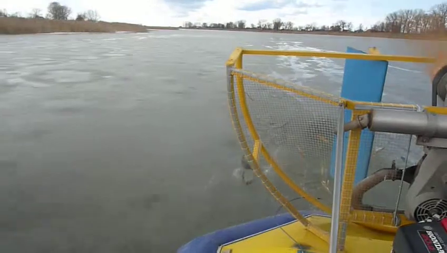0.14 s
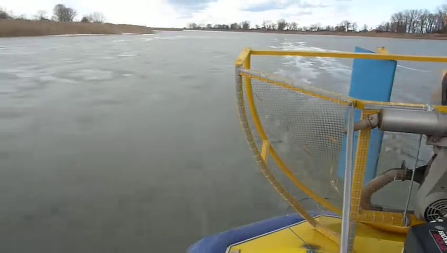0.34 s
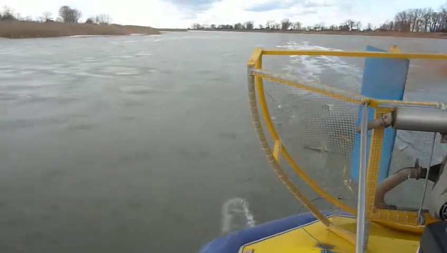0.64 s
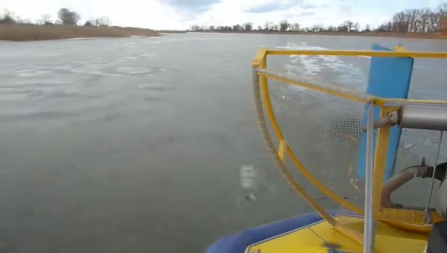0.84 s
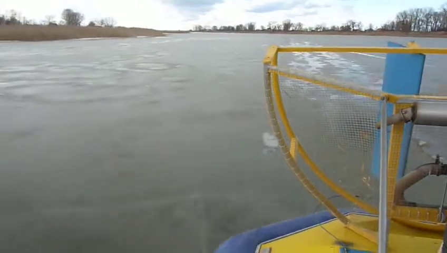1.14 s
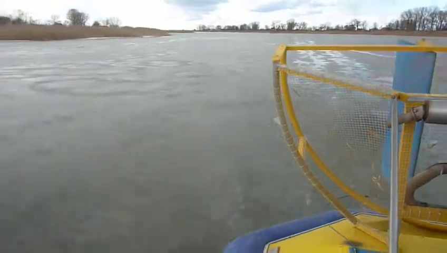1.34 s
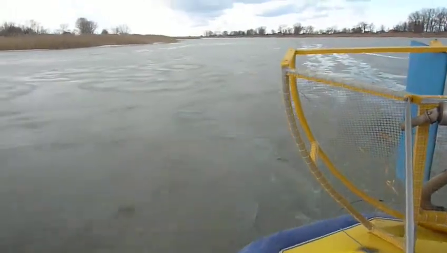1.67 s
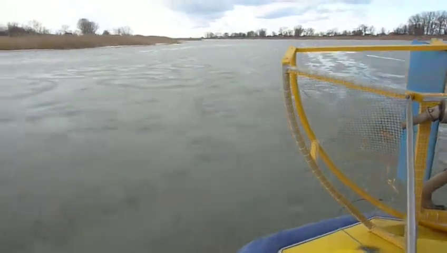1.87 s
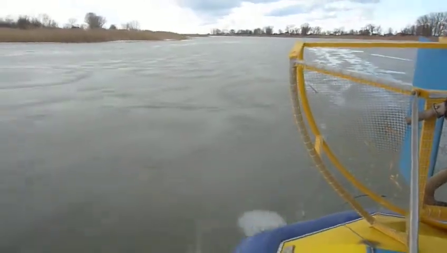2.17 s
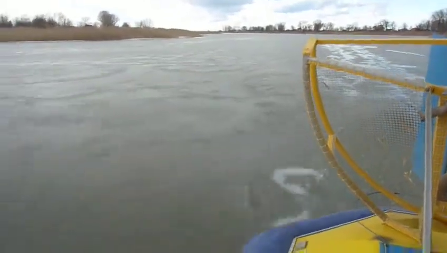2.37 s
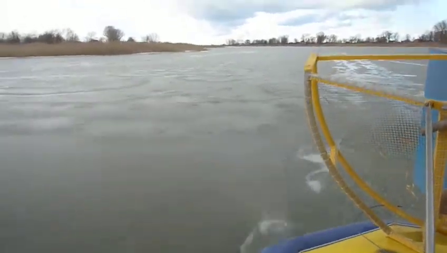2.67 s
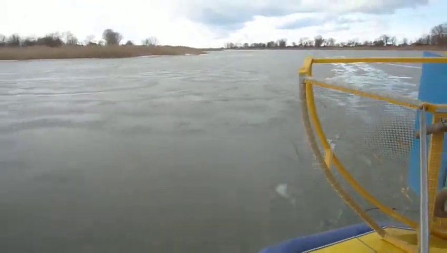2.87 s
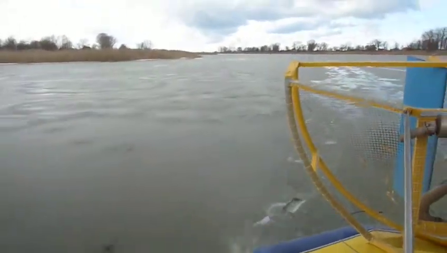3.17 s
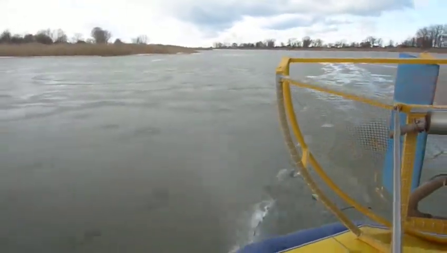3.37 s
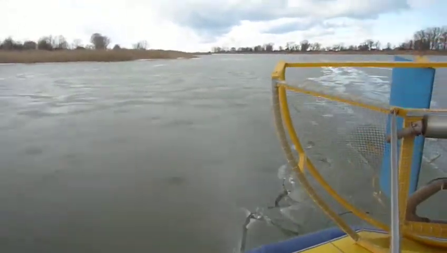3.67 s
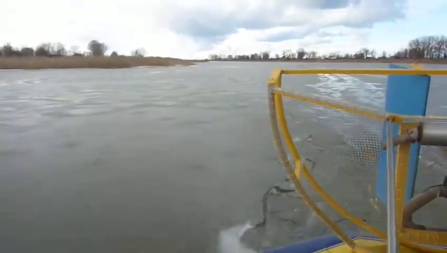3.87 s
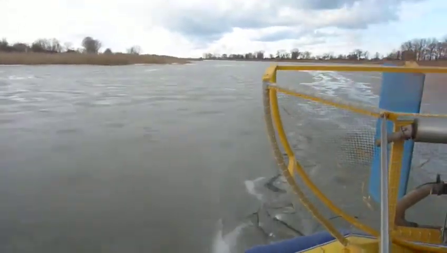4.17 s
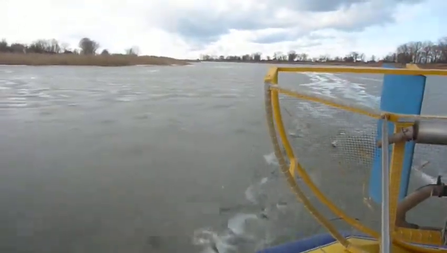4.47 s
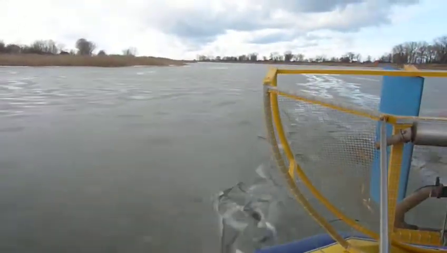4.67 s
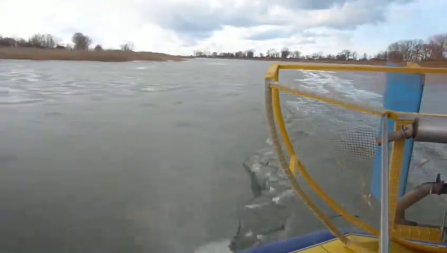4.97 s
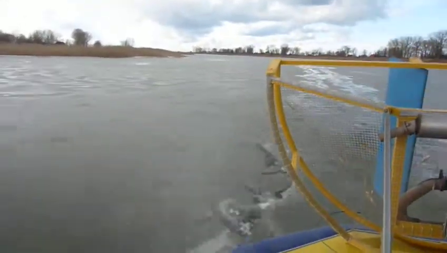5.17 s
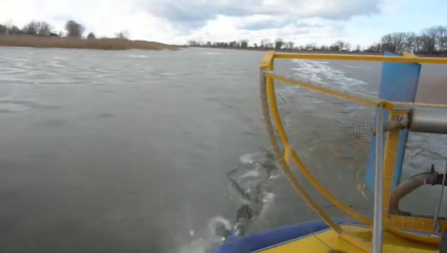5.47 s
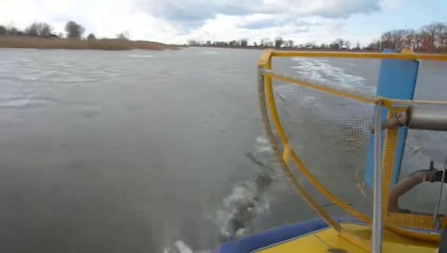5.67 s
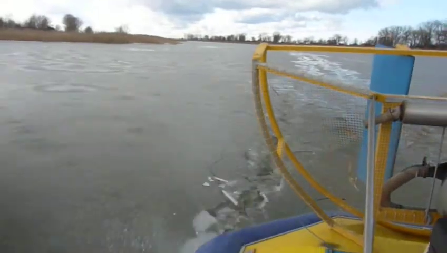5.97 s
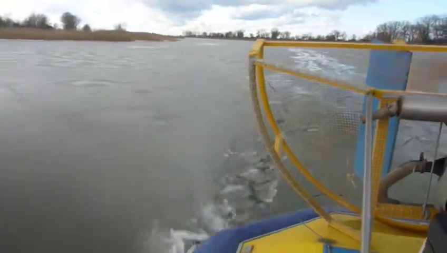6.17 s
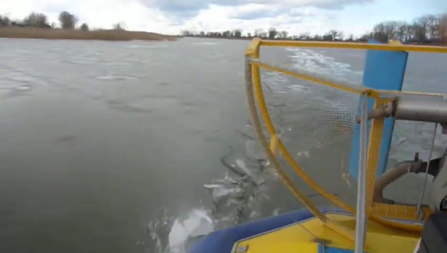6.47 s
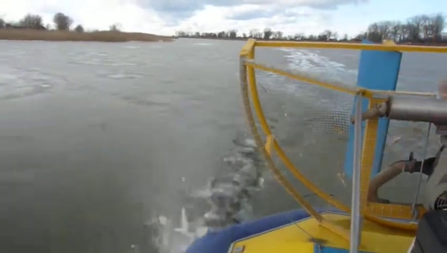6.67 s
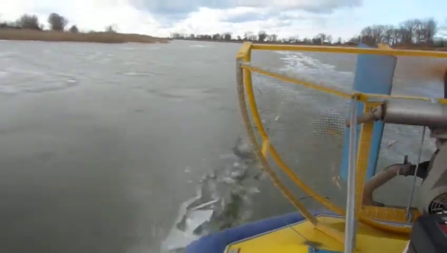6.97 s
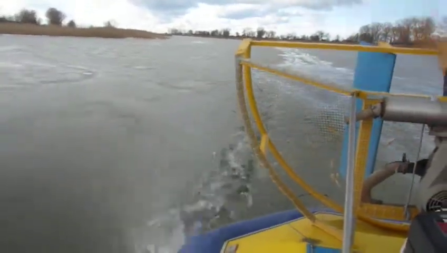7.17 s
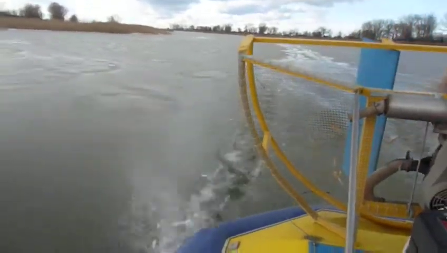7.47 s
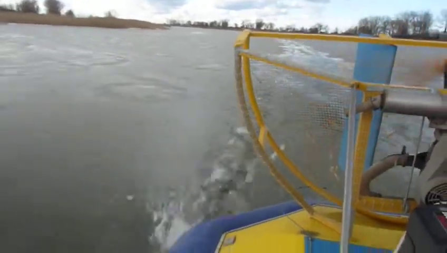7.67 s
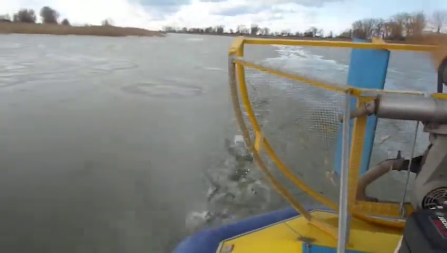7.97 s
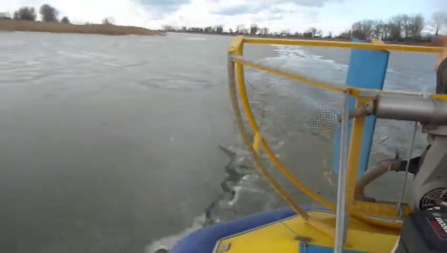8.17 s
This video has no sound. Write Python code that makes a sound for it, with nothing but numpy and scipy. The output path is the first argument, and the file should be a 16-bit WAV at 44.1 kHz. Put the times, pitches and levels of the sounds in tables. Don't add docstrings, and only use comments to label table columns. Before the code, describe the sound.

Steady droning small engine and throbbing propeller on a hovercraft, muffled rushing wash and spray, wind buffeting, dull knocks of broken ice on the hull.

```python
import sys
import numpy as np
from scipy import signal
from scipy.fft import rfft, irfft, next_fast_len
from scipy.io import wavfile
from scipy.ndimage import uniform_filter1d, minimum_filter1d, map_coordinates

SR = 44100
rng = np.random.default_rng(int(sys.argv[2]) if len(sys.argv) > 2 else 0)


def dump_mix(stems):
    frames = np.atleast_2d(stems).T
    limited = np.clip(frames, -1, 1)
    pcm = np.round(limited * 32767).astype(np.int16)
    wavfile.write(sys.argv[1], SR, pcm)


def convert_level_to_amplitude(level_db):
    exponent = np.asarray(level_db, float) / 20
    return 10 ** exponent


N = 366912

GUST_ROWS = sorted([(0.14, 9.0, 0.29, 124.4), (0.48, 2.5, 0.12, 135.2), (0.67, 11.0, 0.41, 132.7),
             (1.01, 4, 0.16, 120.2), (1.25, 13, 0.42, 132.9), (1.66, 9.5, 0.33, 151),
             (2.0, 4.5, 0.11, 129.2), (2.24, 8.5, 0.4, 125.2), (2.48, 5, 0.072, 121.2),
             (2.61, 4.5, 0.41, 136.3), (2.79, 4, 0.084, 131.4), (3.03, 9.5, 0.39, 171),
             (3.28, 3.0, 0.088, 151.6), (3.41, 8, 0.2, 141.1), (3.84, 2.0, 0.4, 125),
             (4.65, 2.5, 0.19, 126.5), (5.77, 2.5, 0.084, 159.9), (6.36, 2.0, 0.19, 124.1),
             (7.68, 2.0, 0.18, 157), (8.28, 8.5, 0.095, 156.7)] + [(.58, 1.5, .06, 160),
             (.9, -0.5, .08, 122.7), (1.76, 2, .08, 172), (3.17, -5, .06, 134)])


def unit(x):
    return x / np.sqrt(np.mean(x ** 2) + 1e-20)


def curves(rows):
    s, *cols = np.transpose(rows)
    return [np.interp(np.arange(N) / SR, s, c) for c in cols]


def wobble(rate_hz):
    knots = rng.standard_normal(int(N * rate_hz / SR) + 4)
    return map_coordinates(knots, [np.arange(N) * rate_hz / SR])


def filtered(x, response):
    m = next_fast_len(N + SR // 2)
    return irfft(rfft(x, m) * response(np.fft.rfftfreq(m, 1 / SR)), m)[:N]


def colour(points):
    f, db = np.transpose(points)
    return lambda hz: convert_level_to_amplitude(np.interp(np.log(hz + 1), np.log(f + 1), db))


def cavity(modes, steep):
    def resonance(hz, centre, width):
        return np.abs(hz * width / (centre * centre - hz * hz + 1j * hz * width)) ** steep

    return lambda hz: np.sqrt(sum((convert_level_to_amplitude(db) * resonance(hz, c, w)) ** 2 for c, w, db in modes))


def rush(response, patchy_db):
    z = signal.stft(rng.standard_normal(N), nperseg=1024)[2]
    patches = uniform_filter1d(rng.standard_normal(z.shape), 8, 0)
    patches = uniform_filter1d(patches, 8, 1)
    noise = signal.istft(z * convert_level_to_amplitude(patchy_db * unit(patches)), nperseg=1024)[1][:N]
    return unit(filtered(noise, response))


def steadied(x, share, span_s):
    swell = np.sqrt(np.abs(uniform_filter1d(x ** 2, int(span_s * SR))) + .02)
    return unit(x / swell ** np.clip(share, 0, 1))


def howl(hz, stray_hz):
    phase = 2 * np.pi * np.cumsum(hz + stray_hz * wobble(22)) / SR
    return unit(convert_level_to_amplitude(2.0 * wobble(25)) * np.sin(phase))


def swells(rows):
    t = np.arange(0, N + 64, 64) / SR
    total = sum(db * np.exp(-(2 * (t - s) / span_s) ** 2) for s, db, span_s, *_ in rows)
    return np.interp(np.arange(N) / SR, t, total)


def surges():
    # collapse in seconds, level in dB, build-up in seconds.
    surge_rows = [(0.07, 2.5, 0.088), (0.3, 1.5, 0.04), (0.5, 0.5, 0.12), (1.12, 3, 0.08),
                  (1.61, 2.5, 0.088), (1.67, 1.5, 0.04), (2.1, 1.5, 0.08), (2.94, 2, 0.15),
                  (3.43, 3, 0.047), (4.04, 2.5, 0.18), (5.039, 4.0, 0.087), (5.59, 4, 0.037),
                  (5.81, 5, 0.04), (5.87, 2, 0.09), (6.01, 1.5, 0.08), (6.869, 3, 0.04), (7.02, 2.5, 0.04),
                  (7.3, 3.5, 0.04), (7.57, 1.5, 0.04), (7.8, 2.5, 0.08), (7.98, 1, 0.12), (8.169, 3, 0.04)]
    lull, lull_s = 0.52, 0.054
    t = np.arange(0, N + 64, 64) / SR
    total = np.zeros(len(t))
    for s, db, rise_s in surge_rows:
        away_s = abs(t - s)
        total += db * np.where(t < s, np.exp(-away_s / rise_s), -lull * np.exp(-away_s / lull_s))
    return np.interp(np.arange(N) / SR, t, uniform_filter1d(total, size=7))


def electronics():
    # frequency in Hz, hiss density in dB per Hz.
    hiss_colour = [(1500, -28), (3500, -4), (5000, -4.5), (7200, -5.5), (7800, -8.5), (8300, -16.5),
                   (8700, -26.5), (9000, -38.5), (9300, -90)]
    # frequency in Hz, rms level in dB.
    whine_tones = [(6665, -85.5)]
    t = np.arange(N) / SR
    hiss = convert_level_to_amplitude(-69.5) * rush(colour(hiss_colour), patchy_db=0.5)
    whine = sum(np.sqrt(2) * convert_level_to_amplitude(db - 1.5) * np.sin(2 * np.pi * hz * t) for hz, db in whine_tones)
    return hiss + whine


def ice():
    # hit in seconds, peak in dB.
    hits = [(0.057, -25), (1.305, -17.5), (3.178, -21), (3.564, -26), (3.912, -13.5), (4.227, -31),
            (5.349, -19), (5.473, -23), (6.488, -15), (7.546, -17), (7.862, -20), (8.121, -17),
            (8.189, -25)]
    # frequency in Hz, level in dB, t60 in seconds.
    panel = [(560, 2, 0.02), (800, -3, 0.025), (1230, -12.5, 0.0086)]
    out, t = np.zeros(N + SR), np.arange(SR // 10) / SR
    onset = 1 - np.exp(-t / .0008)
    for s, peak_db in hits:
        ring = np.zeros(len(t))
        for hz, level_db, t60_s in panel:
            decay_db = level_db + rng.normal(0, 2) - 60 * t / t60_s
            ring += convert_level_to_amplitude(decay_db) * np.sin(2 * np.pi * hz * t)
        start = round(s * SR)
        out[start:start + len(t)] += convert_level_to_amplitude(peak_db - 1.0) * ring * onset
    return out[:N]


def wake(turns):
    # frequency in Hz, density in dB per Hz.
    wash_colour = [(180, -31), (300, -1.5), (339, -2), (430, -1), (576, -4.5), (750, -9.5), (980, -37.5),
                   (1650, -120)]
    spray_colour = [(400, -34), (650, -7), (800, -1.5), (1150, -4), (1450, -8.5), (1750, -13), (2300, -19),
                    (2800, -23.5), (3100, -28), (3600, -27), (4400, -31.5), (5500, -37), (8000, -100)]
    bass_colour = [(20, -41.0), (60, -25.5), (150, -11.5)]
    surge_db = surges()
    sink_db = 0.17 * swells(GUST_ROWS)
    gust_db = .4 * wobble(24)
    roar_db = -29.5 + 1.6 * surge_db - sink_db + gust_db + 0.41 * wobble(35)
    spray_db = -35 + surge_db - sink_db + gust_db + 0.18 * wobble(40)
    roar = convert_level_to_amplitude(roar_db) * rush(colour(bass_colour + wash_colour[1:]), patchy_db=0.36)
    spray = convert_level_to_amplitude(spray_db) * rush(colour(spray_colour), patchy_db=0.12)
    chop = 1 - .04 * np.cos(2 * np.pi * turns) + .04 * np.cos(4 * np.pi * turns + 2.4)
    return chop * (roar + spray)


def cushion(turns):
    # frequency in Hz, width in Hz, level in dB.
    hull_modes = [(62.6, 12, -9), (85.3, 9.8, -2), (126, 15, 1.5), (141.4, 10, -1.5), (168.4, 9.8, -0.5)]
    skirt_modes = [(206.3, 18, -1.5), (220.7, 20, -0.5), (246.2, 17, -5.5)]
    # centre in seconds, boom change in dB, length in seconds, edge tone in Hz.
    seal_rows = [(0.18, -9, 0.11, 191), (0.29, 2.5, 0.056, 210), (0.46, -8, 0.059, 210),
                 (0.61, -4, 0.065, 214), (0.73, -2.5, 0.067, 210), (0.8, 4, 0.071, 214),
                 (1.08, -2.5, 0.1, 230), (1.27, -2, 0.058, 217), (2.09, 4, 0.1, 215),
                 (2.62, -10.5, 0.09, 213), (2.84, -11, 0.058, 231), (3.1, -4, 0.06, 226),
                 (3.22, -5, 0.061, 245), (3.36, -6, 0.057, 214), (3.44, 2, 0.1, 205), (3.95, 2, 0.16, 202),
                 (4.1, -8, 0.061, 222), (4.55, 5, 0.097, 217), (4.92, -4.0, 0.06, 234),
                 (5.1, -7.5, 0.059, 201), (5.3, 4, 0.091, 206), (5.57, 4.5, 0.084, 203),
                 (5.92, 2.5, 0.31, 213), (6.32, 2.5, 0.36, 207), (6.64, 1, 0.06, 233), (6.9, 3, 0.16, 207),
                 (7.56, -6.5, 0.16, 229), (7.84, 1.5, 0.31, 213), (8.31, 5, .04, 220)]
    calm_db, calm_hz, pull_db = -34.5, 184.4, 2.5
    boom_db, sag = -25.5, 0.06

    gust_db = swells(GUST_ROWS)
    gust_hz, high_hz = curves(GUST_ROWS)[2], curves(seal_rows)[2]
    low_hz = calm_hz + (gust_hz - calm_hz) * np.clip(gust_db / pull_db, 0, 1)

    buffet = steadied(rush(cavity(hull_modes, steep=1.5), patchy_db=-1.6), share=0.86, span_s=0.075)
    boom = steadied(rush(cavity(skirt_modes, steep=1.5), patchy_db=-1.5), share=.4, span_s=0.068)
    low = buffet + convert_level_to_amplitude(.25 * gust_db - 2.0) * howl(low_hz, stray_hz=7.96)
    low = steadied(low, share=.6, span_s=.08)
    high = steadied(boom + convert_level_to_amplitude(-4.5) * howl(high_hz + 4, stray_hz=12), share=.6, span_s=.07)

    low_db = calm_db + 1.16 * gust_db + .9 * np.minimum(surges(), 0) + 2.5 * wobble(20)
    high_db = boom_db + 1.24 * swells(seal_rows) - sag * gust_db + 0.52 * wobble(18)
    throb = 1 + .16 * np.cos(2 * np.pi * turns) + .14 * np.cos(4 * np.pi * turns)
    return throb * (convert_level_to_amplitude(low_db) * low + convert_level_to_amplitude(high_db) * high)


def shaft_turns():
    # time in seconds, speed in turns a second.
    shaft_speed = [(0, 31.4), (1.5, 31.55), (3, 31.27), (4.2, 31.33), (5.4, 31.46), (6.5, 31.32),
                   (8.32, 31.3)]
    return np.cumsum(curves(shaft_speed)[0] * (1 + .0015 * wobble(3))) / SR


def propeller(turns):
    # frequency in Hz, gain in dB.
    slap_colour = [(40, -38), (120, -8.5), (330, -11.5), (430, 3.5), (510, -2.5), (600, -6), (700, -11),
                   (1300, -20.5), (2500, -52), (4500, -120)]
    passes = np.flatnonzero(np.diff(np.floor(2 * turns)))
    chance = rng.standard_normal((len(passes), 2))
    nearness = 1 + .7 * (-1.) ** np.arange(len(passes))
    size = convert_level_to_amplitude(2.2 * chance[:, 0]) * nearness
    jitter = np.round(4.5 * chance[:, 1]).astype(int)
    slaps = np.bincount(np.clip(passes + jitter, 0, N - 1), size, N)

    def guard_and_hull(hz):
        echo = 1 + .3 * np.exp(-2j * np.pi * hz * .0035)
        return colour(slap_colour)(hz) * echo

    return convert_level_to_amplitude(-36.5) * unit(filtered(slaps, guard_and_hull))


def lift_engine():
    # time in seconds, four-stroke cycles a second.
    cycle_speed = [(0.74, 15.8), (1.24, 15.52), (1.74, 15.46), (2.24, 15.44), (2.74, 15.6), (3.24, 15.8),
                   (3.74, 15.6), (4.24, 15.4), (4.74, 15.7), (5.24, 15.4), (5.74, 15.63), (6.24, 16),
                   (6.74, 15.85), (7.24, 15.8), (7.74, 15.83)]
    # multiple of the cycle rate, rms level in dB.
    orders = [(2, -58.5), (3, -53.5), (4, -50.5), (5, -39), (6, -46), (7, -44.5), (8, -41.5), (9, -44.5),
              (10, -45.5), (11, -40), (12, -39), (13, -45), (21, -49), (36, -50), (54, -55.5)]
    # centre in seconds, change in dB, length in seconds.
    gulp_rows = [(0.11, -6.5, 0.12), (0.5, 7.5, 0.064), (1.17, -3.5, 0.12), (1.6, -4.5, 0.36),
                 (2.12, 2.5, 0.26), (3.37, 2.5, 0.13), (3.64, -3, 0.067), (4.45, -3.5, 0.081),
                 (4.91, -4, 0.069), (5.1, -7, 0.12), (5.47, -8, 0.08), (6.23, -3, 0.079), (6.71, -11, 0.1),
                 (6.9, -8, 0.08), (7.17, -4, 0.2), (7.61, -4.5, 0.2), (7.93, -5, 0.076),
                 (8.26, -11.0, 0.14)]
    cycle = 2 * np.pi * np.cumsum(curves(cycle_speed)[0] * (1 + .002 * wobble(3))) / SR

    def tone(order):
        flutter = rng.uniform(0, 2 * np.pi) + 0.64 * wobble(12)
        return np.sqrt(2) * np.sin(order * cycle + flutter)

    firing = sum(convert_level_to_amplitude(db + 3 * wobble(9)) * tone(order) for order, db in orders)
    fan_db = -32 + swells(gulp_rows) + 1.1 * wobble(16)
    return firing + convert_level_to_amplitude(fan_db) * tone(18)


def scene():
    turns = shaft_turns()
    return (ice() + wake(turns) + cushion(turns) + propeller(turns) + lift_engine())[None]


def top_cut(x):
    return signal.sosfilt(signal.butter(12, 8950, fs=SR, output="sos"), x)


def record(dry):
    # frequency in Hz, gain in dB.
    treble_rolloff = [(20, 0), (3000, 0), (4500, -12), (6000, -45), (8000, -100)]
    offset, top = -.013, .268
    need = np.minimum(1, top / (np.abs(dry[0] + offset) + 1e-9))
    gain = uniform_filter1d(minimum_filter1d(need, size=400), size=400)
    mirrored = np.pad(dry[0] * gain, (0, N), "symmetric")
    muffled = irfft(rfft(mirrored) * colour(treble_rolloff)(np.fft.rfftfreq(2 * N, 1 / SR)))[:N]
    return top_cut((muffled + electronics() + offset)[None])


dry = scene()
out = record(dry)
dump_mix(out)
```